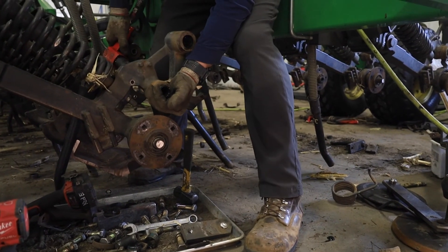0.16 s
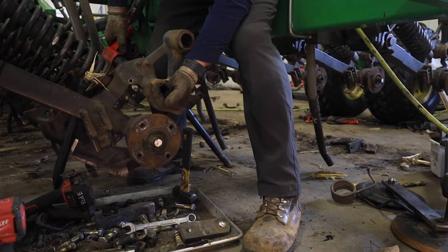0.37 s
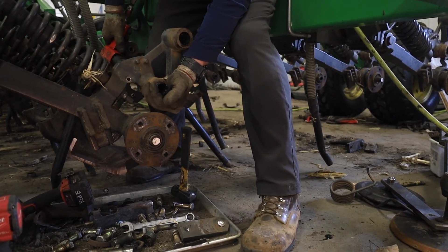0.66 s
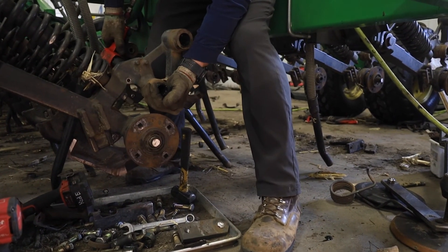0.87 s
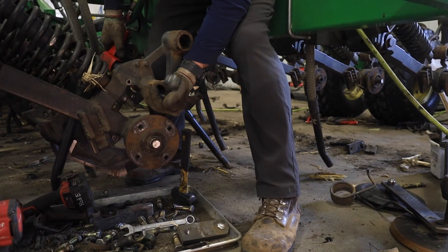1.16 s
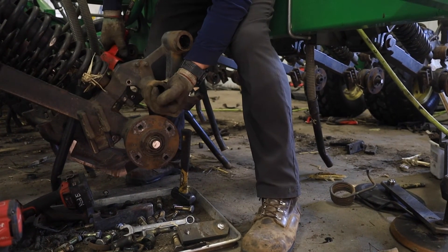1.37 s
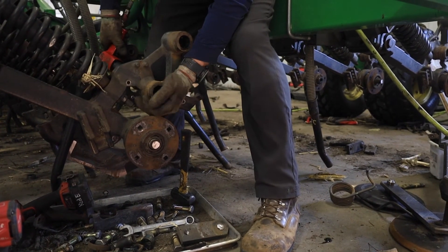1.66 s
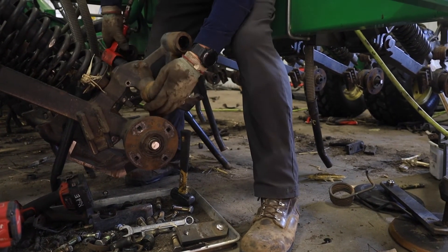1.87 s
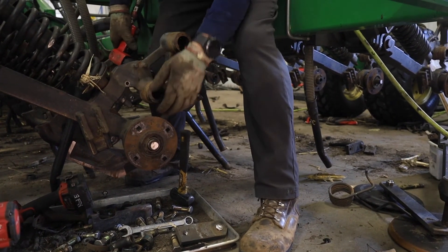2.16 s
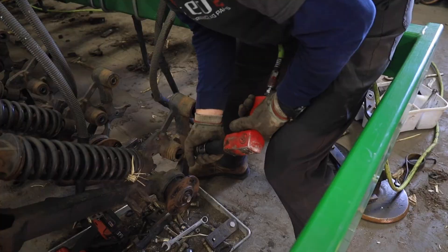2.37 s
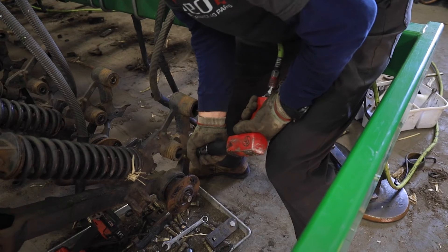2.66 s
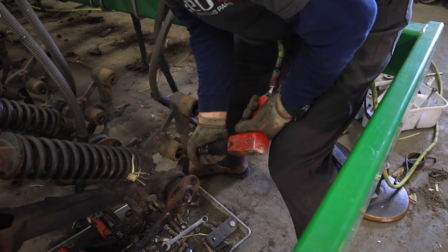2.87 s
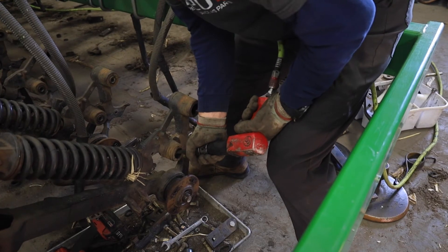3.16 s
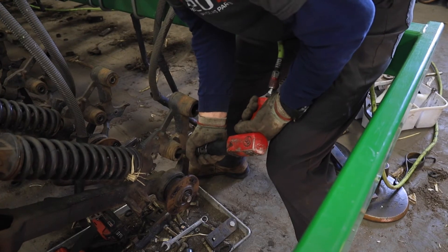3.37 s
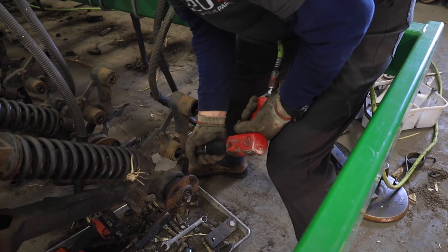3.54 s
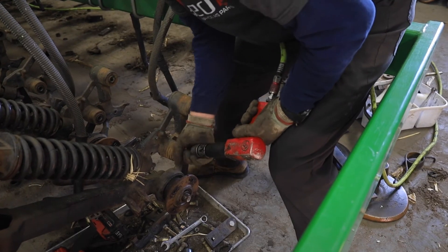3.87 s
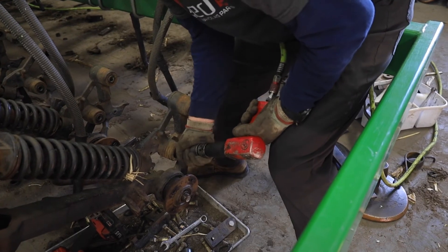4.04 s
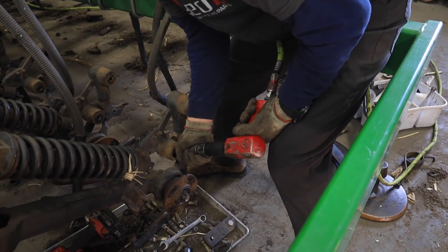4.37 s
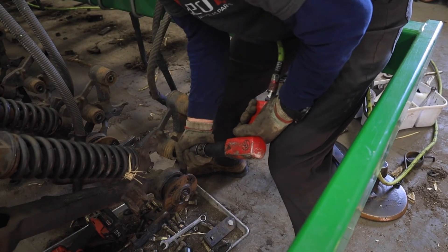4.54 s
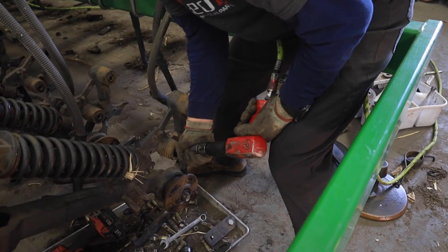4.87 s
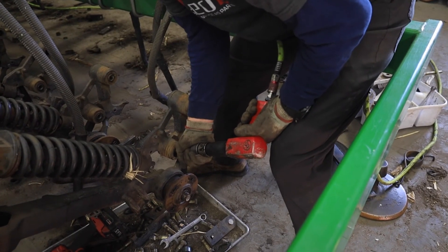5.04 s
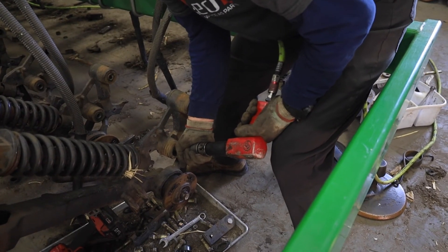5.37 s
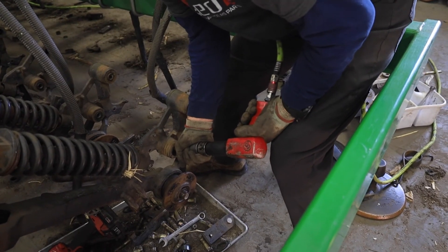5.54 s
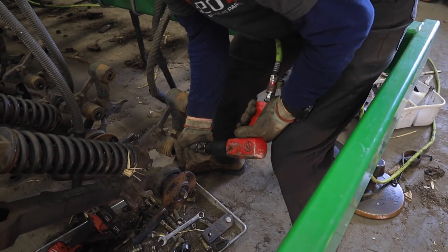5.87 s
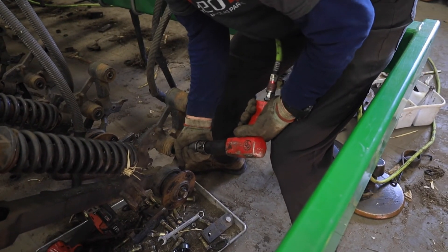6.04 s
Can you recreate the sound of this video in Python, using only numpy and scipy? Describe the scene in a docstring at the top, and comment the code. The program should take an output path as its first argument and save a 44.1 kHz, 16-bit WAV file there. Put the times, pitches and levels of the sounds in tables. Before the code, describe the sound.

Close to the microphone in an echoing workshop, a pneumatic hammer gives three very short bursts on a steel arm, with small knocks and air spits between. After a pause and a faint glove rub, it moves to another spot for a longer, harder run that slows and weakens midway, then fires further short bursts and one half-second run. Each stroke mixes an exhaust thump, metallic crack and hiss; the loudest blows overload slightly.

```python
"""An air hammer drives at a steel hub arm in a workshop, in short bursts and longer runs, in one spot and then another.
Each stroke is a thump of exhaust air, the piston's blow on the chisel and a hissing return puff,
about 20 to 40 times a second. Ringing modes and filtered noise make the steel, short noise jets the air;
steady noise makes the shop air and a leak. A glove rubs briefly and a faint whine comes before the first burst.
The shop reverberates around the tool, and the close microphone overloads on the blows."""
import sys
import numpy as np
from scipy import signal
from scipy.io import wavfile

SR = 44100
rng = np.random.default_rng(int(sys.argv[2]) if len(sys.argv) > 2 else 0)


def transcribe(u):
    """Save the signal u as a 16-bit wav file named by the first command-line argument.

    u: samples, shape (n,) or (channels, n), limited to [-1, 1]; the rate is SR.
    q: integer samples, one column per channel.
    """
    v = np.clip(np.atleast_2d(u).T, -1, 1)
    q = np.round(v * 32767).astype(np.int16)
    wavfile.write(sys.argv[1], SR, q)


N = 273852
TIME = np.arange(N) / SR

# the piston's flight from the exhaust port to the chisel, and when the work moves to the second spot
TRAVEL_S, MOVED_S = .0028, 2.4


def amp(db):
    """Turns decibels into gain."""
    return 10 ** (np.asarray(db) / 20)


def read(points, hz):
    """Reads a table of values by frequency, along a log-frequency axis."""
    f, value = np.transpose(points)
    return np.interp(np.log(hz + 1), np.log(f), value)


def curve(points, s):
    """Reads a control curve at the times s, with straight lines between its points."""
    return np.interp(s, *np.transpose(points))


def decay(t, t60):
    """A fade that falls by 60 dB in t60 seconds."""
    return np.exp(-np.log(1000) * t / t60)


def add(mix, s, sound):
    """Mixes a sound in at s seconds."""
    part = mix[max(round(s * SR), 0):][:len(sound)]
    part += sound[:len(part)]


def pulse(spectrum, size=4096):
    """The causal pulse of unit energy that has this shape of spectrum."""
    hz = abs(np.fft.fftfreq(size, 1 / SR))
    log_gain = np.log(amp(read(spectrum, hz)))
    # the Hilbert transform supplies the phase that puts the energy earliest
    h = np.fft.ifft(np.exp(np.conj(signal.hilbert(log_gain)))).real[:size // 2]
    return h / np.linalg.norm(h)


def colour(x, spectrum):
    """Filters x by a spectrum."""
    return signal.oaconvolve(x, pulse(spectrum))[:N]


def noise_burst(rise, t60, size=6000):
    """Fresh noise that swells and dies; rise is a time constant and t60 a decay time, in seconds."""
    t = TIME[:size]
    swell = 1 - np.exp(-t / rise)
    return rng.standard_normal(size) * swell * decay(t, t60)


def ring(modes, blows, spread_db):
    """Damped modes; each blow (s, dB) lands a little differently and shares its force anew among them."""
    out, t = np.zeros(N), TIME[:SR]
    chance = rng.standard_normal((len(blows), len(modes), 2))
    s, level_db = np.transpose(blows)
    jitter_s = .00006
    for k, (hz, db, t60) in enumerate(modes):
        force = np.zeros(N)
        landing = np.round((s + jitter_s * chance[:, k, 0]) * SR).astype(int)
        force[np.clip(landing, 0, N - 1)] = amp(level_db + spread_db * chance[:, k, 1])
        tone = amp(db) * decay(t, t60) * np.sin(2 * np.pi * hz * t)
        out += signal.oaconvolve(force, tone)[:N]
    return out


# Pulls of the trigger; a limp makes long and short strokes alternate.
# Each row: first stroke in seconds, end in seconds, full rate in Hz, limp in seconds, opening spit in relative dB.
BURSTS = [(.3169, .4, 31.5, 0, 2), (.6134, .735, 37.3, -.002, 7), (1.0867, 1.22, 35.2, 0, -1.5),
          (2.6605, 3.51, 36.25, 0, 0), (4.1294, 4.29, 35.6, 0, .5), (4.5486, 5.105, 34.84, 0, 5),
          (5.3102, 5.48, 33.07, 0, -1), (5.7186, 5.85, 35.6, 0, 4), (6.057, 6.215, 36.1, .002, 0)]
# How the trigger eases during the two long runs. Each row: time in seconds, share of the full rate (0 to 1).
TRIGGER = [(2.739, 1), (2.944, .565), (3.027, .81), (3.5, .766), (4.1, 1), (4.687, 1), (4.729, .839),
           (5.006, .794), (5.044, .634), (5.25, 1)]
# Air pressure in the hose and how hard the chisel bites.
# Each row: time in seconds, pressure in relative dB, bite in relative dB.
DRIVE = [(.35, 2.5, -4), (.67, 5, -3.5), (1.15, 1, -4.5), (2.748, 6.5, 3), (3.3, 4.5, 3.5), (4.2, 5, 0),
         (4.65, 5.5, 1), (4.95, 6.5, -1), (5.4, 5, -3.5), (5.78, 6.5, -4.5), (6.15, 7.5, -7.5)]
# what running at half the rate takes from the exhaust and the blow
PRESSURE_DROP_DB, BITE_DROP_DB = 12.5, 12
FIRST_LAG_S = .0046  # the first stroke is slow
SEATING_DB, RELEASE_DB = -3.5, -5  # the first blow only seats the chisel; the last stroke is starved of air
UNEVEN_DB = .8  # no two strokes are equally strong


def strokes():
    """The piston cycles while the trigger is held; less air makes it slower and weaker.
    Rows: (s, length of the cycle s, exhaust dB, blow dB, halvings of the rate); a last stroke has length 0."""
    times, pressure_db, bite_db = np.transpose(DRIVE)
    rows = []
    for s, end, full_hz, limp, _ in BURSTS:
        k = 0
        while s < end:
            share = curve(TRIGGER, s)
            slowed = -np.log2(share)
            uneven_s = FIRST_LAG_S if k == 0 else limp * (-1) ** (k + 1)
            cycle = 1 / (full_hz * share) + uneven_s
            last = s + cycle >= end
            air_db, blow_db = UNEVEN_DB * rng.standard_normal(2)
            air_db += np.interp(s, times, pressure_db) - PRESSURE_DROP_DB * slowed + RELEASE_DB * last
            blow_db += np.interp(s, times, bite_db) - BITE_DROP_DB * slowed ** 2 + SEATING_DB * (k == 0)
            rows.append((s, 0 if last else cycle, air_db, blow_db, slowed))
            s, k = s + cycle, k + 1
    return rows


def steel(blows, modes, clang, crack, clang_db, clang_t60, crack_db, crack_t60):
    """The arm's dense modes clang alike on every blow; the chatter at the chisel tip is new each time."""
    body, tip = np.zeros(N), np.zeros(N)
    response = noise_burst(rise=0.0012, t60=clang_t60)
    for s, db in blows:
        add(body, s, amp(db + clang_db) * response)
        chatter_t60 = crack_t60 * amp(0.28 * db)  # a light blow stops chattering sooner
        add(tip, s, amp(db + crack_db) * noise_burst(rise=0.00012, t60=chatter_t60))
    tones = ring(modes, blows, spread_db=1.5)
    return colour(body, clang) + colour(tip, crack) + tones


# The chisel knocks lightly on the work. Each row: time in seconds, relative level in dB.
TAPS = [(.452, -44), (1.2496, -13), (1.5489, -28), (1.7636, -39), (1.951, -35.5), (4.3307, -9.5),
        (5.5108, -6)]
# What a blow rings with in the first spot (A) and the second (B).
# Each row: pitch in Hz, relative level in dB, time to fall 60 dB in seconds.
MODES_A = [(438, -26.5, 0.17), (738, -22.5, 0.1), (1466, -13, 0.023), (1550, -36, 0.053),
           (3144, -17, 0.023), (3420, -25, 0.086), (4150, -27, .07), (4410, -30, .06), (4660, -41.5, 0.12),
           (7380, -29.5, 0.09), (10400, -37, 0.16), (13200, -28, .08)]
MODES_B = [(612.5, -41, 0.3), (873, -19.5, 0.045), (1526, -17.5, 0.077), (1623, -45, 0.077),
           (1783.4, -12.5, 0.085), (1730, -40, 0.72), (2464, -21.5, 0.068), (2477, -33.5, 0.23),
           (3038, -26, 0.1), (3110, -14.5, 0.028), (3483, -25, 0.076), (4250, -28.5, 0.089),
           (4474, -26.5, 0.11), (5300, -40, 0.16)]
# Tone colour of the arm's clang in each spot. Each row: frequency in Hz, relative level in dB.
CLANG_A = [(100, -15), (300, -17), (700, 1.5), (1100, -11), (1600, -4), (2600, -9), (4300, -12),
           (8000, -42.5)]
CLANG_B = [(100, -14.5), (300, -8), (700, -4), (1100, -3.5), (1600, -2), (2100, -7.5), (3100, -9),
           (4000, -9), (8000, -30)]
# Tone colour of the crack at the chisel tip in each spot. Each row: frequency in Hz, relative level in dB.
CRACK_A = [(150, -16.5), (600, -4), (1600, 4.5), (2500, -13), (4300, -2), (6000, 0), (9000, -12),
           (12500, 5), (16000, -5.5)]
CRACK_B = [(150, -10), (600, 13), (1600, 20.5), (3100, 12.5), (3900, 2), (6000, 7.5), (9000, 10),
           (13000, 1), (16000, 12.5)]
# The chisel's own high modes. Each row: pitch in Hz, relative level in dB, time to fall 60 dB in seconds.
CHISEL = [(12695, -29, .06), (13400, -27, .05), (13790, -25, .06), (14392, -19, .065), (15120, -24, .08)]
# How freely the chisel rings. Each row: time in seconds, change of level in dB.
CHISEL_FREE = [(1.3, -30), (2.7, -40), (3.5, -23), (4.2, 0), (4.7, -15), (5.0, 2.5), (5.4, 2.5),
               (5.8, 11.5), (6.2, 7)]
# A glancing blow makes one mode of the steel sing out.
# Each row: time in seconds, pitch in Hz, level in dB, time to fall 60 dB in seconds.
PINGS = [(0.674, 4400, -15, 0.11), (1.178, 12200, -14, 0.084), (1.182, 4460, -19.5, 0.077),
         (1.249, 7160, -10.5, 0.024), (1.343, 11600, -23, 0.011), (1.549, 9100, -41.5, 0.075),
         (1.951, 6383, -47.5, 0.077), (5.511, 15000, -31, 0.066), (5.839, 15120, -26, 0.13)]


def hammering(cycles):
    """The piston strikes the chisel just after it uncovers the exhaust port, and steel and chisel ring."""
    blows = [(s + TRAVEL_S, db) for s, _, _, db, _ in cycles] + TAPS
    first_blows = [b for b in blows if b[0] < MOVED_S]
    second_blows = [b for b in blows if b[0] >= MOVED_S]
    first = steel(first_blows, MODES_A, CLANG_A, CRACK_A,
                  clang_db=-18.5, clang_t60=0.093, crack_db=-11, crack_t60=0.052)
    second = steel(second_blows, MODES_B, CLANG_B, CRACK_B,
                   clang_db=-18.5, clang_t60=0.064, crack_db=-11.5, crack_t60=0.062)
    chisel_blows = [(s, db + curve(CHISEL_FREE, s)) for s, db in blows]
    chisel = ring(CHISEL, chisel_blows, spread_db=3)
    pings = sum(ring([(hz, db, t60)], [(s, 0)], spread_db=0) for s, hz, db, t60 in PINGS)
    return first + second + chisel + pings


RETURN_SHARE = .483  # the piston turns round near mid-cycle
RETURN_DROP_DB = 24.5  # what running at half the rate takes from the return thump


def returns(cycles):
    """The piston turns round after every stroke but a burst's last: (s, exhaust dB, thump dB)."""
    return [(s + RETURN_SHARE * cycle, db, db - RETURN_DROP_DB * slowed)
            for s, cycle, db, _, slowed in cycles if cycle > 0]


# Stray spits of air as the trigger opens or shuts.
# Each row: time in seconds, hiss in relative dB, thump in relative dB.
SPITS = [(0.5734, 4.5, -14), (0.765, 3, -27), (1.248, 13, -7), (1.3435, -4, -30), (3.654, -17, -55),
         (4.5087, 2.5, -10), (5.68, 4, -6.5)]
# Tone colour of the exhaust thump. Each row: frequency in Hz, relative level in dB.
THUMP = [(25, -58), (70, -28.5), (140, -6.5), (240, 2.5), (400, 3), (600, 0.5), (900, -3), (1500, -18),
         (4000, -24), (16000, -57)]
# Tone colour of the hissing jet. Each row: frequency in Hz, relative level in dB.
HISS = [(200, 12.5), (1000, 15.5), (3000, 2), (5500, 5.5), (9000, 4), (13000, 6), (16000, 15)]
DRAW_BACK_S = .0177  # the piston draws back this long before the first stroke
# the floor throws the thump back: delay in the first and second spot, and level
BOUNCE_S, BOUNCE_DB = (.00265, .0029), -8


def exhaust(cycles, first_thump_db, second_thump_db, spit_db, opening_thump_db,
            forward_db, return_db, return_thump_db):
    """Each opening of a port lets out a pressure thump and a short jet; the return puff comes near mid-cycle."""
    # puffs: (s, jet dB, thump dB)
    puffs = [(s, jet_db + spit_db, push_db) for s, jet_db, push_db in SPITS]
    puffs += [(s - DRAW_BACK_S, db + spit_db, db + opening_thump_db) for s, *_, db in BURSTS]
    puffs += [(s, db + forward_db, db) for s, _, db, _, _ in cycles]
    puffs += [(s, jet_db + return_db, push_db + return_thump_db) for s, jet_db, push_db in returns(cycles)]
    push, jet = np.zeros(N), np.zeros(N)
    for s, jet_db, push_db in puffs:
        spot = int(s >= MOVED_S)
        thump = -amp(push_db + (first_thump_db, second_thump_db)[spot])[None]  # one sample, coloured below
        add(push, s, thump)
        add(push, s + BOUNCE_S[spot], amp(BOUNCE_DB) * thump)
        add(jet, s, amp(jet_db) * noise_burst(rise=0.0079, t60=0.016))
    return colour(push, THUMP) + colour(jet, HISS)


# The heavy frame under the work. Each row: pitch in Hz, relative level in dB, time to fall 60 dB in seconds.
FRAME = [(70, -31, 0.12), (271.2, -29, 0.22)]


def recoil(cycles, first_spot_db, second_spot_db, return_db):
    """Both ends of the piston's travel shake the heavy frame, the more so the more air drives it."""
    kicks = [(s, db) for s, _, db, _, _ in cycles]
    kicks += [(s, db + return_db) for s, _, db in returns(cycles)]
    shakes = [(s + TRAVEL_S, db + (first_spot_db if s < MOVED_S else second_spot_db)) for s, db in kicks]
    return ring(FRAME, shakes, spread_db=0.0)


# The piston bumps in the barrel without striking. Each row: time in seconds, relative level in dB.
BUMPS = [(.5772, -21), (1.244, -30), (1.321, -31), (2.958, -13), (3.004, -42), (4.5108, -24.5),
         (5.091, -14), (5.1433, -15), (5.2062, -17.5), (5.2685, -20.5), (5.509, -20), (5.6815, -21)]


def barrel():
    """An idling piston rings the hollow body of the tool and ticks against its end."""
    ticks, tick_db = np.zeros(N), -25
    for s, db in BUMPS:
        add(ticks, s, amp(db + tick_db) * noise_burst(rise=0.00018, t60=0.021))
    body_modes = [(697, -3.0, 0.048), (680, -36.0, 0.17), (1734, -22.5, 0.15)]  # (Hz, dB, t60 s)
    return ring(body_modes, BUMPS, spread_db=1.0) + ticks


# How long the building's tail lasts. Each row: frequency in Hz, time to fall 60 dB in seconds.
SHOP = [(120, 0.56), (400, 1.63), (1000, 1.57), (2800, 1.38), (5000, 1.03), (8000, 0.55), (15000, 0.25)]
# Tone colour of the tail. Each row: frequency in Hz, relative level in dB.
SHOP_COLOUR = [(50, -36.5), (150, 6.5), (400, -7), (1000, -0.5), (3000, -0.5), (6000, -2), (15000, 4)]


def shop(x, near_db, near_t60, hall_db):
    """Quick scatter from the floor and the machine frame, then the long tail of the building."""
    t = TIME[:2 * SR]
    sparse = rng.random(len(t)) < .05  # only a few samples carry an echo
    near = rng.standard_normal(len(t)) * sparse * (t > .004) * decay(t, near_t60)
    # the tail is noise whose every frequency band dies at its own speed
    hz, age, z = signal.stft(rng.standard_normal(len(t)), SR, nperseg=512)
    z = z * amp(read(SHOP_COLOUR, hz))[:, None] * decay(age, read(SHOP, hz)[:, None])
    fade_in = np.clip((t - .01) / 0.0066, 0, 1)
    hall = signal.istft(z, SR, nperseg=512)[1][:len(t)] * fade_in
    echoes = amp(near_db) * near / np.linalg.norm(near) + amp(hall_db) * hall / np.linalg.norm(hall)
    return x + signal.oaconvolve(x, echoes)[:N]


# A glove sliding off the steel. Each row: time in seconds, level in dB.
RUB_DB = [(2.19, -94), (2.235, -57), (2.27, -58.5), (2.33, -65), (2.39, -92)]
# Tone colour of the glove's rub. Each row: frequency in Hz, relative level in dB.
RUB = [(200, -3), (900, -2), (1600, 9.5), (2800, 3), (5000, -30), (15000, -26)]


def glove():
    """The rub of the glove is coloured noise that swells and fades once."""
    return amp(curve(RUB_DB, TIME)) * colour(rng.standard_normal(N), RUB)


# Narrow bands of the whine and wide ones of the fizz.
# Each row: centre in Hz, nominal width in Hz, relative level in dB.
WHINE = [(473, 7.8, -4), (550, 12, -11.5), (1211, 20, 4), (2880, 360, -0.5), (4330, 680, 5.5)]
# Loudness of whine and fizz together. Each row: time in seconds, level in dB.
WHINE_DB = [(0, -76), (.17, -75.5), (.27, -71), (.4, -100)]


def whine():
    """A faint thin whine over a soft fizz: noise in a few resonances, gone as the first burst gets going."""
    out = np.zeros(N)
    for hz, width, db in WHINE:
        pole = np.exp(-np.pi * 2 * width / SR + 2j * np.pi * hz / SR)
        band = signal.lfilter([1], np.poly([pole, pole]), rng.standard_normal(N)).real
        out += amp(db) * band / band.std()
    return amp(curve(WHINE_DB, TIME)) * out


# Air leaking at the hose coupling. Each row: time in seconds, level in dB.
LEAK_DB = [(0, -70), (1.2, -69), (1.6, -63.5), (2.0, -65), (2.33, -63.5), (2.39, -78), (2.6, -66), (4, -69),
           (6.2, -61.5)]
# Tone colour of the leak. Each row: frequency in Hz, relative level in dB.
LEAK = [(1000, -22), (5500, -9), (7500, -0.5), (9200, 5.5), (11000, -6.5), (15500, -20.5)]


def coupling_leak():
    """Air escaping through a small gap hisses: coloured noise that follows a level curve."""
    return amp(curve(LEAK_DB, TIME)) * colour(rng.standard_normal(N), LEAK)


# Tone colour of the shop air. Each row: frequency in Hz, relative level in dB.
FLOOR = [(18, -39.5), (30, -14), (59, -10.5), (182, -5.5), (2550, -13), (4540, -10), (6050, -22),
         (7080, -7.5), (7860, -23), (11600, -6), (15500, -6)]


def shop_air():
    """The air of the shop is a steady bed of coloured noise."""
    return amp(-60.5) * colour(rng.standard_normal(N), FLOOR)


def scene():
    """The hammer sounds in the reverberant shop; the quiet layers are added without reverberation."""
    cycles = strokes()
    air = exhaust(cycles, first_thump_db=7.0, second_thump_db=11.5, spit_db=-1.5, opening_thump_db=-24,
                  forward_db=8.5, return_db=4.0, return_thump_db=-9.5)
    frame = recoil(cycles, first_spot_db=-8.5, second_spot_db=-7, return_db=-6.5)
    tool = hammering(cycles) + frame + barrel() + air
    hammer_in_shop = shop(tool, near_db=-17, near_t60=.11, hall_db=-20.5)
    background = glove() + whine() + coupling_leak() + shop_air()
    return (hammer_in_shop + background)[None]


def record(dry):
    """The microphone softly flattens high peaks; then a low cut and a treble limit."""
    ceiling = .185
    clipped = dry / (1 + (dry / ceiling) ** 8) ** (1 / 8)
    low_cut_hz, edge_hz = 40, 15850
    low_cut = signal.butter(2, low_cut_hz, "high", fs=SR, output="sos")
    thinned = signal.sosfilt(low_cut, clipped)
    band_limit = signal.firwin(511, edge_hz, window=("kaiser", 9), fs=SR)
    return signal.oaconvolve(thinned, band_limit[None], "same")


dry = scene()
out = record(dry)
transcribe(out)
```